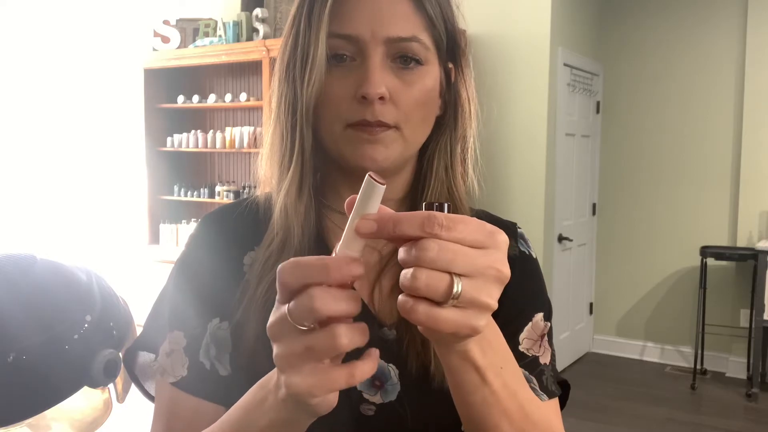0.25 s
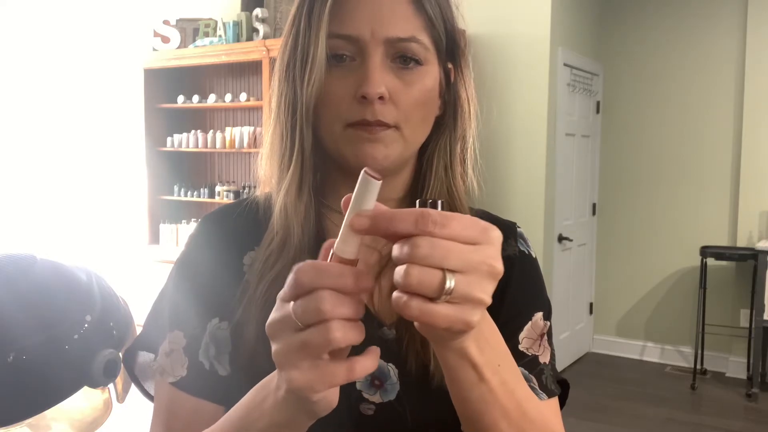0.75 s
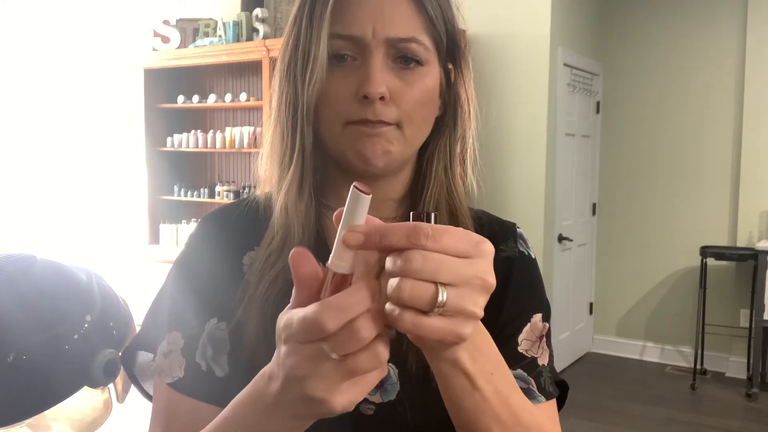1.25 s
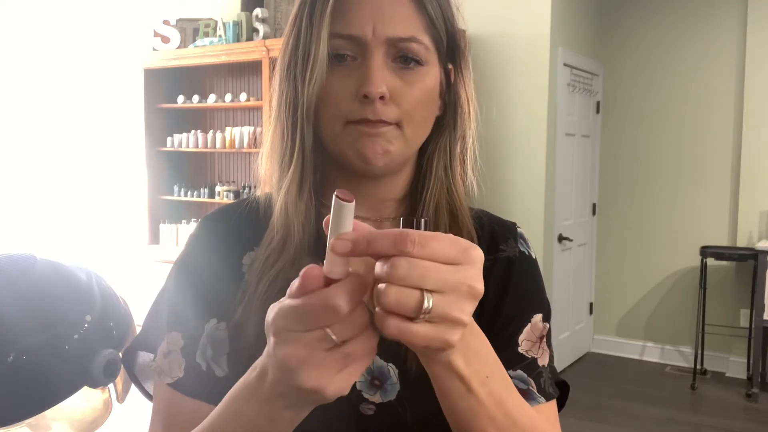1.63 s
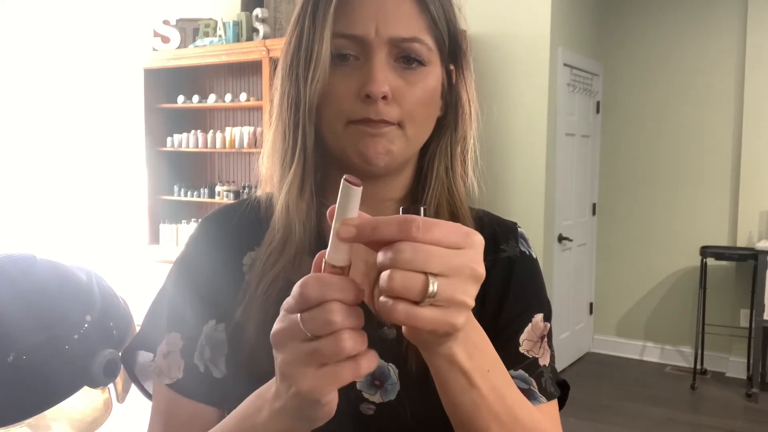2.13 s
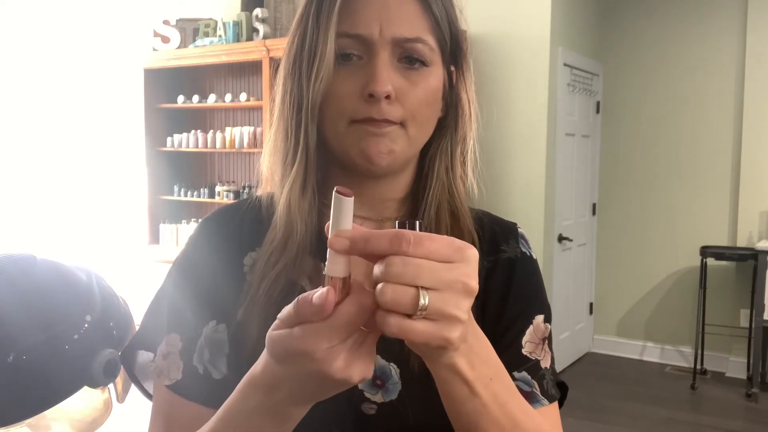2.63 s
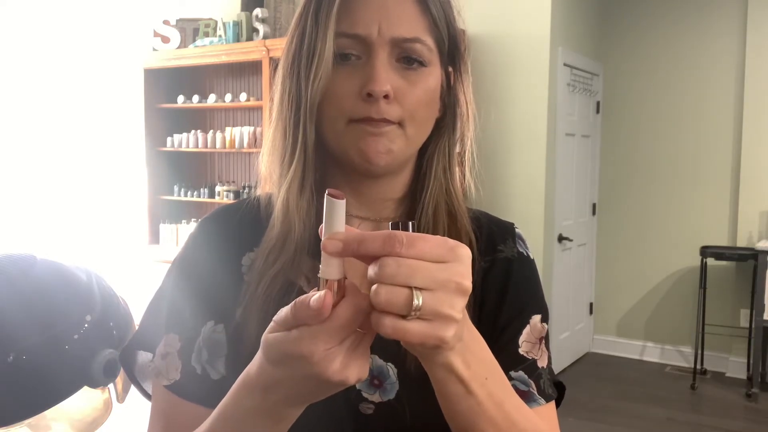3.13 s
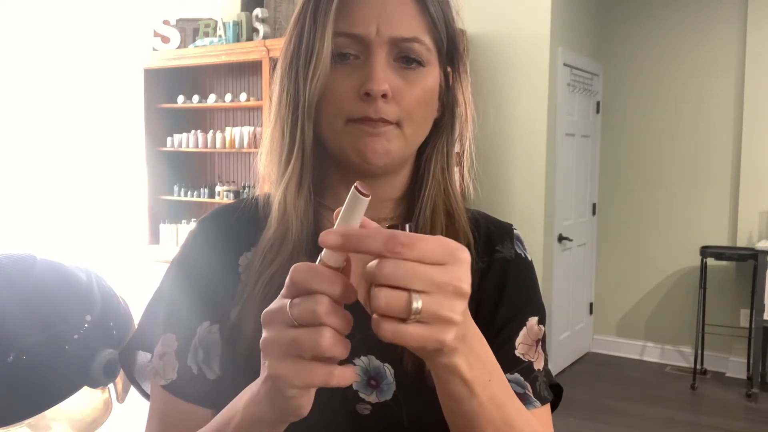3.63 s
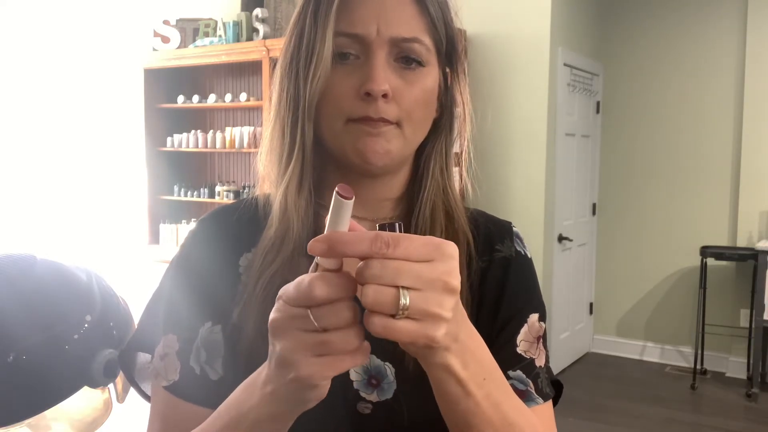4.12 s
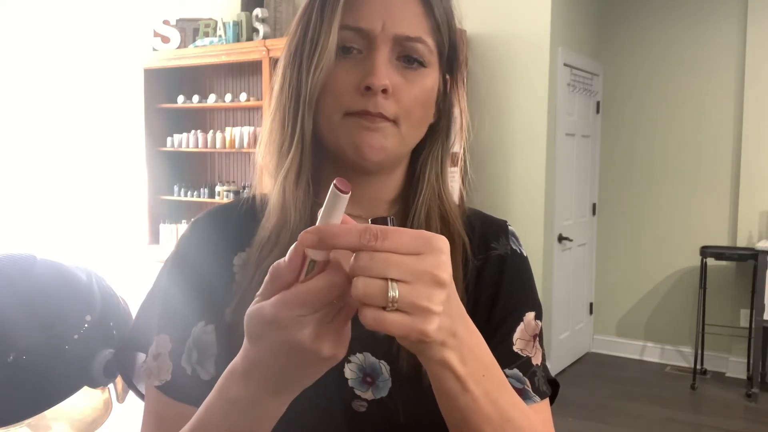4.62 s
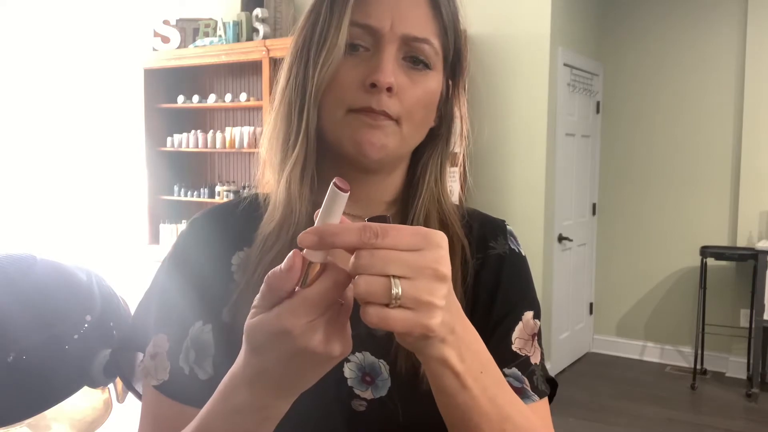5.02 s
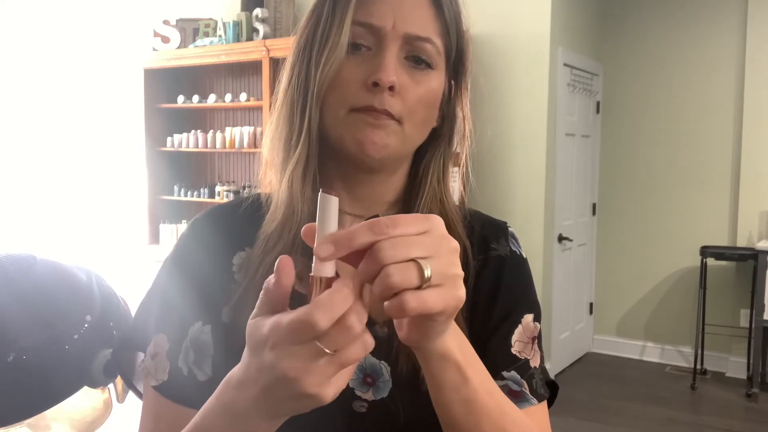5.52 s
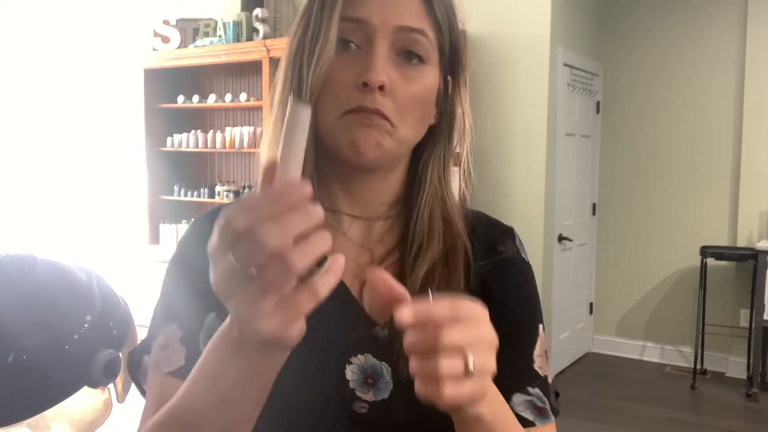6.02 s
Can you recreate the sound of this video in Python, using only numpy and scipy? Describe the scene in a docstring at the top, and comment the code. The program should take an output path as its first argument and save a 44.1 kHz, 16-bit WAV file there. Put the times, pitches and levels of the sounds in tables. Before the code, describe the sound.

A small plastic cosmetic tube is twisted by hand, its ratchet clicking in five dry bursts over low ventilation rumble in a bare room.

```python
"""The end of an earlier click fades, then the ratchet in a small plastic tube clicks in five bursts as a hand twists it.
Each click is a noisy blow that makes pawl, tube wall and hollow barrel ring; the bare room answers with noise echoes.
After the fourth burst and again after the last, fingers brush the tube: soft swells of noise and tiny ticks.
Ventilation rumble, wavering hum and hiss, all shaped noise, run throughout; a pair of microphone ports hears it all."""
import sys
import numpy as np
from scipy import signal
from scipy.fft import rfft, irfft, next_fast_len
from scipy.io import wavfile

SR = 44100
rng = np.random.default_rng(int(sys.argv[2]) if len(sys.argv) > 2 else 0)


def master_out(mix):
    """Clip the mix to full scale and print it as 16-bit PCM to the path in sys.argv[1]."""
    frames = np.transpose(np.atleast_2d(mix))
    ceiling = np.clip(frames, -1, 1)
    pcm = np.round(ceiling * 32767).astype(np.int16)
    wavfile.write(sys.argv[1], SR, pcm)


N = 276066  # length in samples
LANDS = 176  # samples from the start of a click to its blow

# Resonances of the pawl, the catch that drops into the ratchet teeth.
# Each row: centre in Hz, width in Hz, relative level in dB.
PAWL = [(7210, 830, -6.5), (8430, 660, 1), (11110, 3100, 0), (13570, 1300, 3), (14300, 700, -1.5),
        (15400, 1200, 1.5)]


def ratchet():
    """Each tooth that slips past the pawl gives one click, placed at its moment."""
    # The pawl drops a second time, late, with a bare snap. Each row: time in seconds, snap level in dB.
    late_drops = [(1.0387, -45.5), (3.9207, -45), (4.0483, -44), (4.1756, -46), (4.2907, -47.5)]
    # A click just before the start: snap, knock and ring levels in dB, barrel tilt in dB per octave.
    earlier_click = (-36.5, -44.5, -50.5, -0.5)
    out = np.zeros((2, N + SR))
    bare_snaps = [(s, db, db - 18, db - 11, 3) for s, db in late_drops]
    for s, *levels in [*blows(), *bare_snaps]:
        sound = click(*levels)
        start = round(s * SR) - LANDS
        out[:, start:start + sound.shape[1]] += sound
    left_over = click(*earlier_click)[:, 600:]  # only its fading end is heard
    out[:, :left_over.shape[1]] += left_over
    return out[:, :N]


def blows():
    """Time, snap, knock, ring and tilt of every tooth: a tightening grip makes the barrel knock harder."""
    # Ratchet teeth slipping. Each row: time in seconds, snap level in dB.
    teeth = [(0.2594, -39.5), (0.2758, -36.5), (0.2932, -38.5), (0.3084, -35.5), (0.3233, -39.5),
             (0.355, -38), (0.7153, -42), (0.736, -39.0), (0.7515, -39), (0.768, -40.5), (0.794, -42),
             (0.8351, -42.5), (0.874, -39.5), (0.9123, -38), (0.959, -37), (1.0351, -39.5), (1.4927, -43),
             (1.508, -39), (1.5274, -41.0), (1.5539, -36.5), (1.5865, -38.5), (1.6249, -33),
             (1.6785, -39.5), (2.0781, -43.5), (2.1105, -42.0), (2.1566, -44), (2.2033, -43),
             (2.2467, -43.5), (2.2824, -40.5), (2.3256, -40.5), (2.383, -40.0), (2.448, -39),
             (2.5373, -40.5), (3.9171, -45.5), (4.0417, -47.0), (4.1686, -48.0), (4.2893, -44),
             (4.392, -42.0), (4.5011, -40.5), (4.5978, -37.5), (4.6969, -40)]
    # Twists of the hand. Each row: start in seconds, barrel knock at full grip in dB, how much softer at
    # first in dB, clicks to reach full grip, wall ring at full grip in dB, barrel tilt in dB per octave.
    twists = [(.2, -43, 11, 3.85, -53, -0.4), (.7, -47.5, 0, 0.7, -54, -7.5),
              (1.45, -41, 11, 5.05, -48, 6.5), (2.05, -46, 4.5, 1.4, -56, -10), (3.9, -40, 16, 6.3, -57, 5)]
    last_softer_db = 3  # the grip eases on the last tooth of a twist
    ring_follows = .4  # share of the softening that the wall shows
    varies_db = 2.35  # typical chance difference from knock to knock and ring to ring

    s, snap_db = np.transpose(teeth)
    twist = np.searchsorted(np.transpose(twists)[0], s) - 1
    tooth = np.arange(len(s)) - np.searchsorted(twist, twist)  # counted from 0 in each twist
    full_db, first_db, builds, ring_db, tilt_db = np.transpose(twists)[1:, twist]
    is_last = np.append(twist[1:], -1) != twist
    softer = first_db * np.clip(1 - tooth / builds, 0, 1) + last_softer_db * is_last
    chance = varies_db * rng.standard_normal((len(s), 2))
    knock_db = full_db - softer + chance[:, 0]
    wall_db = ring_db - ring_follows * softer + chance[:, 1]
    return np.transpose([s, snap_db, knock_db, wall_db, tilt_db])


def click(snap_db, knock_db, ring_db, tilt_db):
    """The pawl lands with one blow amid a few ms of swelling and dying noise; pawl, wall and barrel ring."""
    # Hollow barrel of the tube. Each row: centre in Hz, width in Hz, relative level in dB before the tilt.
    hollow = [(1470, 400, -5), (1696, 85, 4.5), (2152, 330, 12.5), (2600, 61, -5), (2887, 240, 13),
              (4050, 1300, -2)]
    # Tube wall. Each row: centre in Hz, width in Hz, relative level in dB.
    wall = [(4800, 700, -10), (6370, 260, -0.5)]
    blur = 2.2  # heard from all sides, the resonances are this many times wider

    t = (np.arange(1024) - LANDS) / SR
    blow = t == 0  # a single sample
    swell = np.where(t < 0, amp(-1 + 60 * t / 0.0041), amp(-60 * t / .012))
    noise = rng.standard_normal((3, len(t))) * swell
    barrel = [(c, w, db + tilt_db * np.log2(c / hollow[0][0])) for c, w, db in hollow]

    def part(table, db, loose):
        """One body set ringing by the blow and the loose noise around it, at an rms level in dB."""
        return amp(db) * unit(filtered(blow + loose, lambda hz: modes(table, hz)))

    near = part(PAWL, snap_db, 0.097 * noise[0])
    near = near + part(barrel, knock_db, .05 * noise[1])
    near = near + part(wall, ring_db, 0.11 * noise[2])
    bodies = [(PAWL, snap_db), (barrel, knock_db), (wall, ring_db)]
    clean = sum(part(np.multiply(table, [1, blur, 1]), db, 0.) for table, db in bodies)
    sound = echo(near, clean)
    sound[:, :len(t)] += ports(near)
    return sound


def modes(table, hz):
    """Response of a small ringing body: a sum of resonances of alternating sign, without bass."""
    small_hz = 1090  # so small a tube radiates little below this
    bassless = -hz * hz / (small_hz ** 2 - hz * hz + 1.3j * hz * small_hz)
    total = 0
    for k, (c, w, db) in enumerate(table):
        total = total + (-1) ** k * amp(db) * 1j * hz * w / (c * c - hz * hz + 1j * hz * w)
    return bassless * total


def echo(rattly, clean):
    """A fresh room tail: quick early reflections, then a late echo where each pitch dies at its own speed."""
    # How long the room rings. Each row: frequency in Hz, seconds to fall by 60 dB.
    dying = [(700, 0.29), (2000, .33), (5000, 0.36), (9000, 0.28), (15000, 0.31)]
    # Colour of the late echo. Each row: frequency in Hz, relative level in dB.
    late_colour = [(700, -5), (2000, -18.5), (5000, -15.5), (9000, -15), (13000, -19.5), (14300, -40),
                   (15500, -43)]
    # Colour of reflections from the desk and near walls. Each row: frequency in Hz, relative level in dB.
    early_colour = [(700, -9.5), (2000, -11), (3200, -6), (5000, -1.5), (9000, -6), (13000, -16),
                    (16000, -7.5)]
    rise_s = .0012  # the first reflection needs about this long, in seconds

    def late_gain(hz, t):
        return amp(along(late_colour, hz)[:, None] - 60 * t / along(dying, hz)[:, None])

    def early_gain(hz, t):
        return amp(along(early_colour, hz)[:, None] - 60 * t / 0.042)

    def tail(shape, gain):
        """Noise whose colour changes over time, with a soft start."""
        hz, t, z = signal.stft(rng.standard_normal(shape), SR, nperseg=128)
        noise = signal.istft(z * gain(hz, t), SR, nperseg=128)[1]
        seconds = np.arange(noise.shape[-1]) / SR
        return noise * (1 - np.exp(-(seconds / rise_s) ** 2)) * amp(-24)

    out = signal.fftconvolve(clean[None], tail((2, SR // 3), late_gain), axes=1)
    front, left, right = tail((3, SR // 16), early_gain)
    reflections = 1.3 * ports(front) + 1.5 * np.array([left, right])
    early = signal.fftconvolve(rattly[None], reflections, axes=1)
    out[:, :early.shape[1]] += early
    return out


def ports(x):
    """A sound in front as the two ports hear it: left and right differ in phase and level with pitch."""
    # Each row: frequency in Hz, radians by which the left leads, left minus right in dB.
    differences = [(0, 0, 0), (900, 1, 0), (2000, -.8, 0), (3000, -1.2, 0), (4500, -3.6, -1),
                   (6200, -4.5, -1), (6800, -9.4, 0), (7600, -10.5, 1), (8200, -15.7, 3), (9400, -21.3, 4),
                   (10300, -19.7, 0), (16000, -15.8, 0)]
    f, lead, lean_db = np.transpose(differences)

    def response(hz):
        phase = 1j * np.interp(hz, f, lead)
        level = np.interp(hz, f, lean_db) * np.log(10) / 20  # dB to natural log
        return np.exp(np.outer([.5, -.5], phase + level))  # half the difference to each side

    return filtered(x, response)


def fingers():
    """Skin brushing the tube makes soft swells of noise; tiny ticks make the pawl resonances ring."""
    # Soft brushing. Each row: middle in seconds, half length in seconds, level in dB, centre in Hz.
    brushes = [(3.326, 0.1, -86, 2060), (5.154, 0.043, -77, 1860), (5.477, 0.042, -84, 2600),
               (5.55, 0.091, -76, 1840), (6.118, 0.064, -79.5, 1930)]
    # Colour of the brushing. Each row: multiple of the centre frequency, relative level in dB per Hz.
    skin = [(.25, -16), (.6, 13), (1, 15.5), (1.6, 6), (4, -17), (7, -59)]
    # Faint ticks. Each row: time in seconds, relative strength in dB before they ring.
    faint = [(3.26, -61.5), (3.6022, -71), (5.8094, -59.5)]

    t = np.arange(N) / SR
    rubs = 0
    for s, half, db, centre_hz in brushes:
        colour = np.multiply(skin, [centre_hz, 1])
        swell = np.exp(-((t - s) / half) ** 2)
        rubs = rubs + amp(db) * swell * rush(lambda hz: amp(along(colour, hz)))
    ticks = np.zeros(N)
    for s, db in faint:
        start = round(s * SR)
        ticks[start:start + 200] = amp(db - 60 * t[:200] / .008) * rng.standard_normal(200)
    return rubs + amp(-3.0) * ports(filtered(ticks, lambda hz: modes(PAWL, hz)))


def air():
    """Duct rumble, narrow wavering motor hum and microphone hiss, each made of filtered noise."""
    # Wavering motor tones. Each row: centre in Hz, width in Hz, level in dB.
    tones = [(60.6, 16, -61.5), (127.7, 9.2, -60.5), (178.6, 31, -63.5)]
    # Colour of the duct rumble. Each row: frequency in Hz, relative level in dB per Hz.
    rumble_colour = [(13, -67), (22, -32.5), (56, -5), (96, -5.5), (129, -4), (187, -13.5), (214, -17),
                     (258, -16), (467, -29), (563, -53.5), (700, -41.5), (910, -75.5), (1540, -120)]
    # Colour of the hiss. Each row: frequency in Hz, relative level in dB per Hz.
    hiss_colour = [(300, -26.5), (500, -4.5), (700, -12), (1200, -16.5), (2500, -24), (6000, -26.5),
                   (8200, -29.5), (9800, -26), (11600, -25), (14100, -29), (14700, -37), (17000, -60)]
    hum = sum(amp(db) * rush(lambda hz: np.exp(-((hz - c) / w) ** 2)) for c, w, db in tones)
    rumble = amp(-55) * rush(lambda hz: amp(along(rumble_colour, hz)))
    hiss = amp(-78.5) * rush(lambda hz: amp(along(hiss_colour, hz)))
    return hum + rumble + hiss


def rush(gain):
    """Stereo noise of rms 1, mixed from a shared and an opposed noise to be partly alike left and right."""
    # Each row: frequency in Hz, left-right likeness (1 the same, 0 unrelated, -1 opposite).
    likeness = [(60, .9), (130, .8), (290, 0.44), (640, -0.47), (1400, -0.27), (3100, 0.49), (7000, -0.28),
                (10000, -0.42), (15000, 0.96)]
    # Each row: frequency in Hz, left minus right in dB.
    balance = [(60, 2.5), (200, 4.5), (400, 3), (700, -0.3), (15000, 0.5)]

    def mid_side(hz):
        turn = np.arccos(np.clip(along(likeness, hz), -1, 1)) / 2
        return gain(hz) * [np.cos(turn), np.sin(turn)]

    mid, side = filtered(rng.standard_normal((2, N)), mid_side)
    both = np.array([mid + side, mid - side])
    return unit(filtered(both, lambda hz: amp(np.outer([.5, -.5], along(balance, hz)))))


def amp(db):
    """Gain of a level in dB."""
    return 10 ** (np.asarray(db) / 20)


def unit(x):
    """Scaled to rms 1."""
    return x / np.sqrt(np.mean(x ** 2) + 1e-20)


def along(points, hz):
    """Value at each frequency, read between (Hz, value) points on a log axis."""
    f, v = np.transpose(points)
    return np.interp(np.log(hz + 1), np.log(f + 1), v)


def filtered(x, response):
    """Each frequency of x times a response, which may be complex to shift its phase."""
    n = x.shape[-1]
    m = next_fast_len(n + 2048)  # spare room, so that ringing does not wrap round to the start
    return irfft(rfft(x, m) * response(np.fft.rfftfreq(m, 1 / SR)), m)[..., :n]


def scene():
    """Tube, hand and room together."""
    return ratchet() + fingers() + air()


def record(dry):
    """The microphone fades above 16 kHz and nothing is kept from the band limit of 17300 Hz up."""
    return filtered(dry, lambda hz: (hz < 17300) / (1 + (hz / 16100) ** 50))


dry = scene()
out = record(dry)
master_out(out)
```